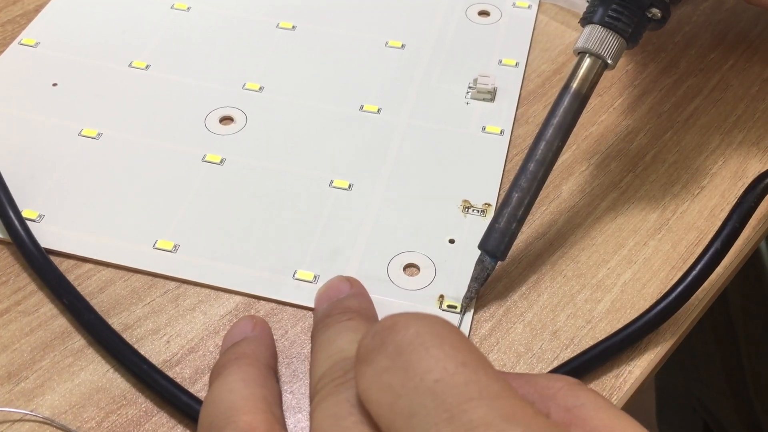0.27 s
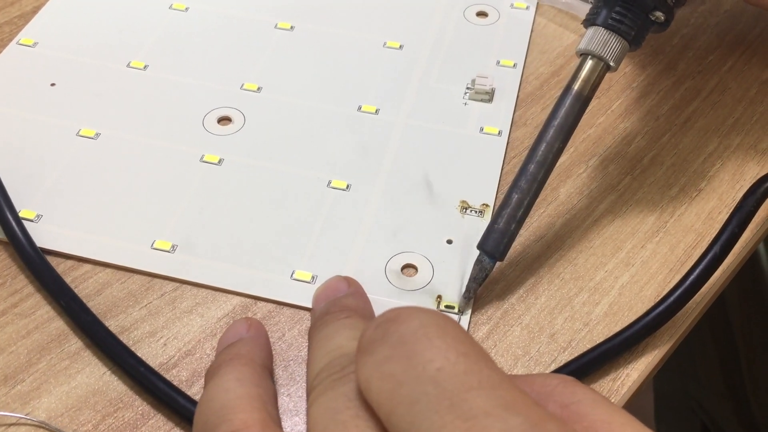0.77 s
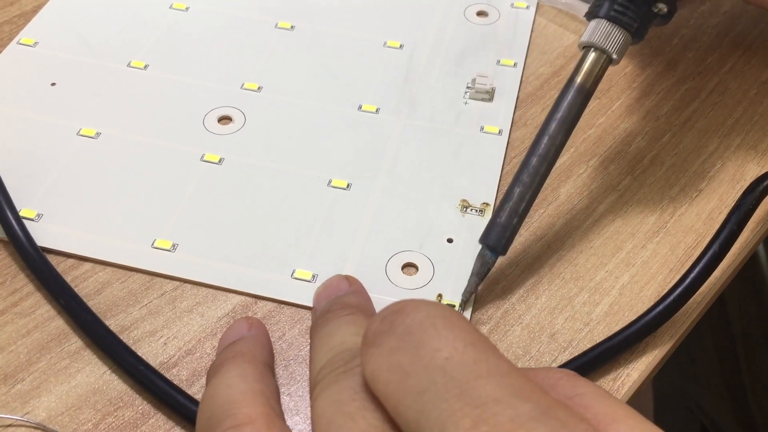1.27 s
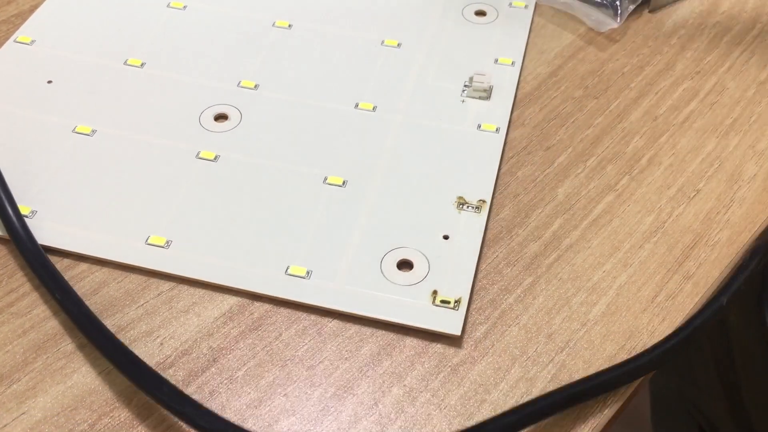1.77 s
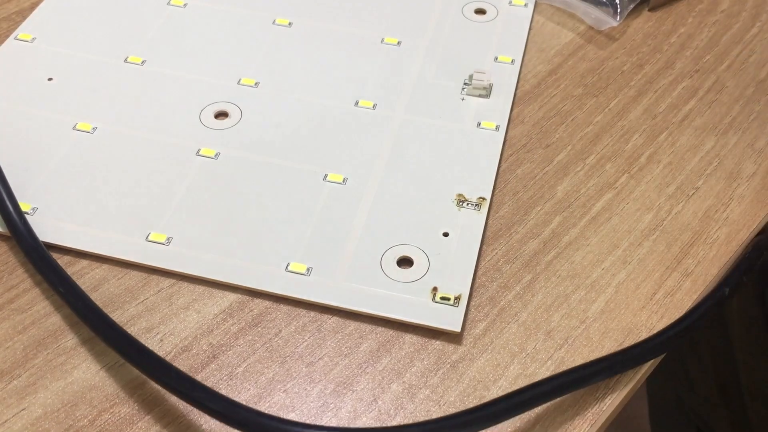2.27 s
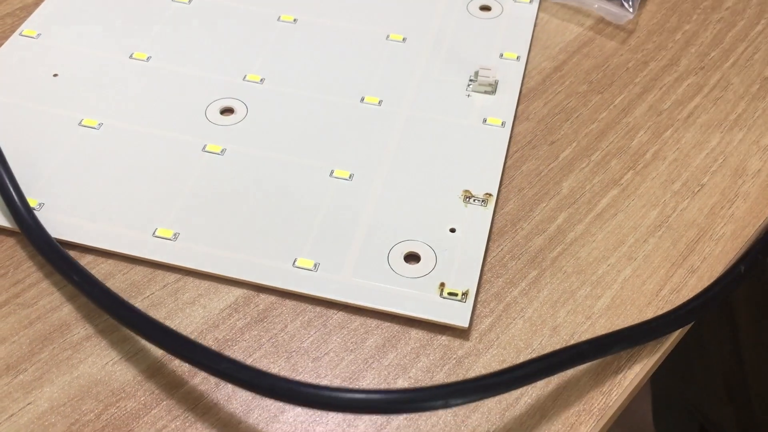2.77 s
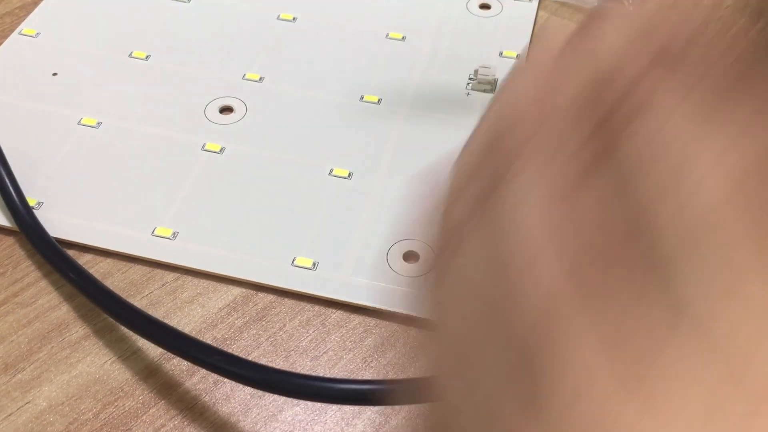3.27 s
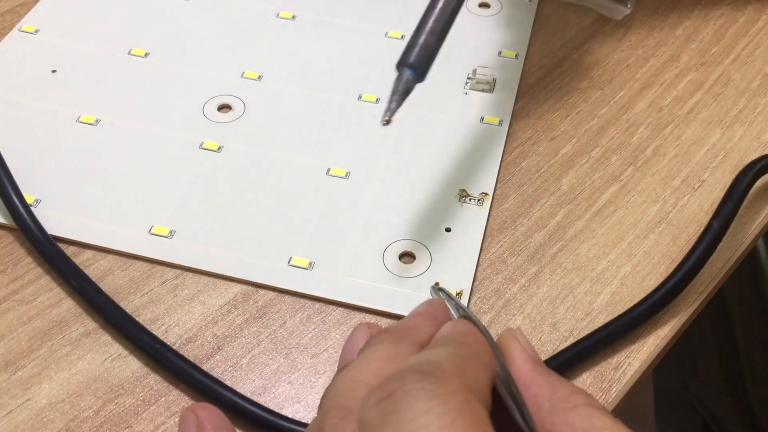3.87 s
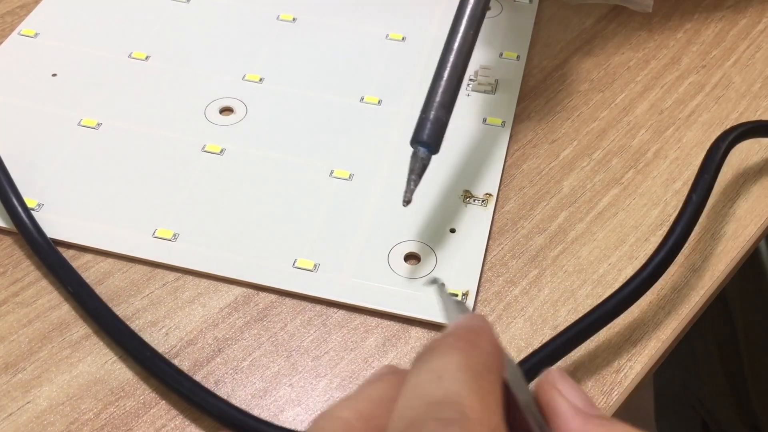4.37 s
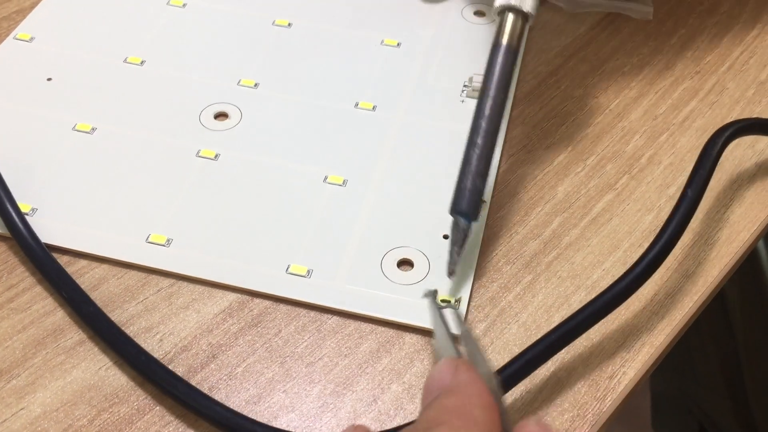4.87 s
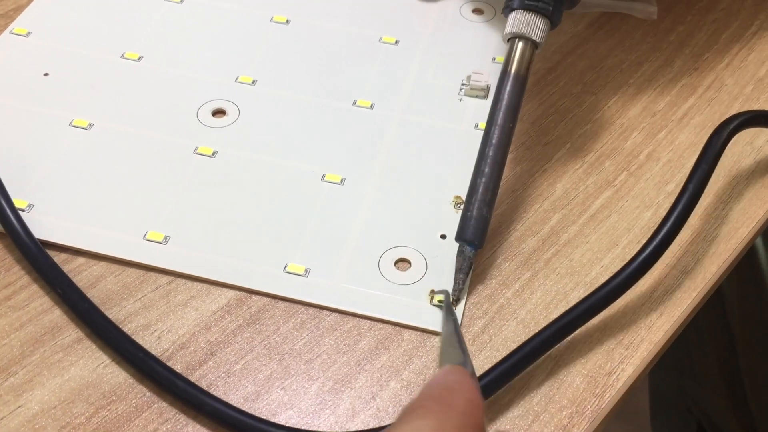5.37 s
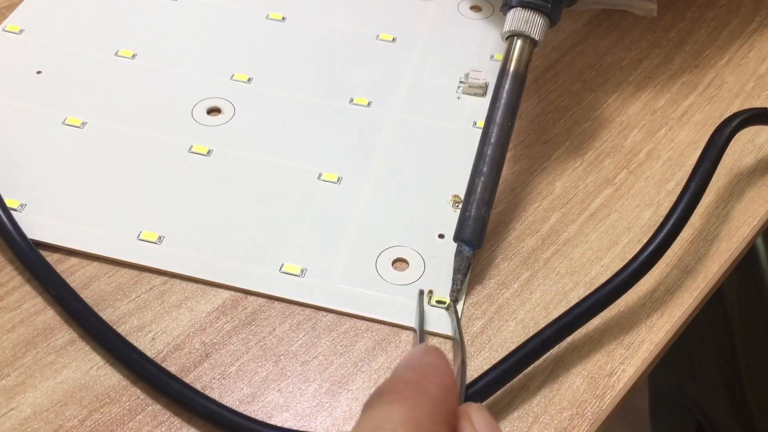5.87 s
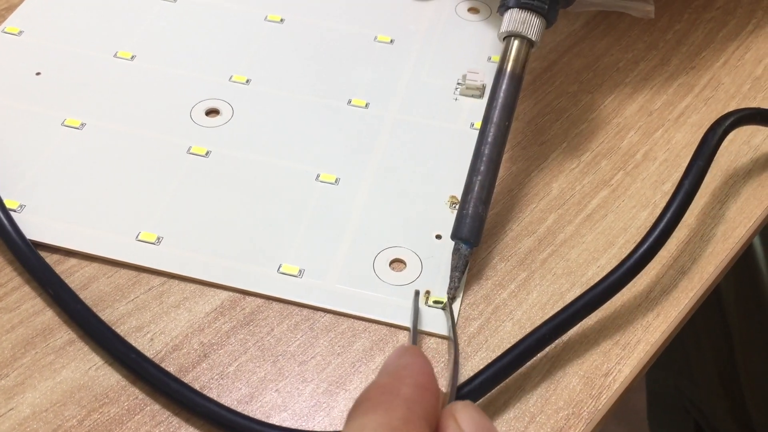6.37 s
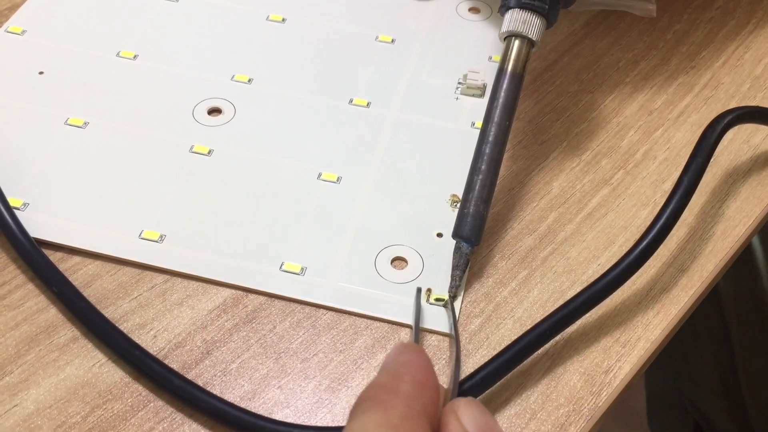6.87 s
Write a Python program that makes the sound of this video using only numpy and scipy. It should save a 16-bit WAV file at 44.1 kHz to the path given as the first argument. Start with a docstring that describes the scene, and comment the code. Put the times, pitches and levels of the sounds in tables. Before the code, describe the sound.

Close microphone at a wooden bench in a small quiet room. Low hiss and soft rumble lie beneath. After over a second of near silence come faint taps and scrapes, a dull double knock, then a loud, bright clatter as a metal tool lands with a short rattle. Later, tweezers click and scratch on a circuit board in a quick cluster, then little but room air.

```python
"""Soldering at a wooden bench

Tools knock, clink, rattle and scrape on the bench in a small, quiet room; tweezers and iron tip
tick on a circuit board, and solder hisses faintly. Contacts are a snap plus damped noise in five bands,
with decaying sines for ringing parts; rubs and solder fizz are slip trains, squeaks are filtered noise,
and steady shaped noise lies beneath."""
import sys
import numpy as np
from scipy import signal
from scipy.fft import rfft, irfft
from scipy.io import wavfile

SR = 44100
rng = np.random.default_rng(int(sys.argv[2]) if len(sys.argv) > 2 else 0)


def inscribe(sig):
    """Save sig as 16-bit PCM at rate SR to the path in sys.argv[1].

    A 1-D sig is mono; a 2-D sig holds one channel per row.
    Samples are clipped to [-1, 1] before scaling.
    """
    pcm = np.round(np.clip(np.atleast_2d(sig).T, -1, 1) * 32767)
    wavfile.write(sys.argv[1], SR, pcm.astype(np.int16))


N = 314433
HIT_SAMPLES = SR // 100   # event levels refer to 10 ms
TAIL_S = np.arange(int(0.6 * SR)) / SR

# tool knocks: t/s, level/dB, hardness/dB, weight/dB, resonance f/Hz, base t60/s, clink/dB re level
KNOCK_EVENTS = [(1.394, -42, 5, -9.5, 3160, 0.019, -37), (1.503, -51, -2, 0, 1900, 0.065, -26),
                (1.627, -49, -2, -3.5, 2100, 0.044, -19), (1.8667, -28, -12, -15.5, 2540, 0.014, -47),
                (1.87, -28.5, -7, -12.5, 2390, 0.026, -45), (2.442, -36, 4, -2, 2410, 0.05, -31.5),
                (2.4879, -35, 6, -10, 1700, 0.054, -13.5), (2.4934, -19.5, 7.5, -14.5, 1880, 0.024, -9),
                (2.5037, -21.5, -1.5, -16.5, 2210, .029, -29), (2.5418, -30, 2, -14.5, 1866, 0.044, -8.5)]
# tweezer and tip taps: t/s, level/dB, hardness/dB, resonance f/Hz, base t60/s
TICK_EVENTS = [(1.585, -57.5, -27, 1560, 0.066), (1.7464, -51, 13, 13600, .021),
               (1.7645, -70, 20, 13400, 0.025), (2.4785, -57, 14, 12000, 0.0061),
               (2.881, -45, 7, 3360, 0.017), (3.009, -56.5, 11.5, 8400, 0.032),
               (3.262, -57.5, 8.5, 3260, 0.028), (3.4507, -49, -6, 2420, 0.052),
               (3.6022, -52.5, -15, 2530, 0.043), (3.7083, -34.5, 5, 3940, 0.03),
               (3.713, -43.5, 2, 4400, 0.024), (3.857, -29, -7, 3050, 0.02),
               (3.8796, -35.5, -24, 1420, .008), (3.9919, -37.5, 0, 2880, 0.044),
               (4.0103, -44, -3, 1160, 0.013), (4.026, -41, 3.5, 2970, 0.024),
               (4.0498, -39, 4, 5500, 0.0097), (4.963, -64, -38.5, 1270, 0.023),
               (5.0384, -45, 5.5, 4070, 0.033), (5.247, -60.5, -23, 3140, 0.052)]
# prongs springing together: t/s, level/dB
PINCH_EVENTS = [(3.4949, -45), (3.5054, -48), (3.512, -50), (3.627, -59)]
# metal catching and squeaking: t/s, level/dB, f/Hz
SQUEAK_EVENTS = [(0.862, -57.5, 12300), (1.701, -57, 14100), (2.043, -50, 2150), (2.105, -49.5, 2420),
                 (4.137, -63, 4100), (4.748, -59.5, 3260), (4.769, -59, 2500), (4.811, -63, 3880)]
# scrapes, drags, solder fizz: t/s, length/s, level/dB, hardness/dB, weight/dB
RUB_EVENTS = [(0.836, 0.017, -79, 27, 0), (0.857, .04, -95, 23, -2), (1.523, 0.024, -63, 15.5, -10),
              (1.565, 0.022, -63, 13.5, 5), (1.679, .095, -68, 14.5, 0.5), (1.82, 0.055, -58.5, 7, 4.5),
              (1.877, 0.052, -54, 8, -10), (2.15, 0.25, -72.5, -4, 0), (2.409, 0.067, -65.5, 9, 9.5),
              (2.443, 0.065, -49, 0, 0.5), (2.481, 0.0085, -32, -10, -13), (2.513, 0.025, -44.5, -10, 4.5),
              (3.19, 0.33, -73.5, 13, -0.5), (3.556, 0.083, -69, 9.5, 5.5), (3.676, 0.029, -66.5, 10, 7),
              (3.719, 0.024, -75.5, -4.5, 20.5), (3.839, 0.026, -43.5, 5.5, -16),
              (3.961, 0.034, -46, 5, -25), (3.991, 0.075, -46, 5.5, -25), (4.041, 0.0061, -40.5, 13.5, -23),
              (4.099, 0.021, -49, 5, -19), (4.164, 0.028, -63, 0, 4), (4.245, 0.089, -68.5, 1, -2),
              (4.73, 0.086, -66, 4.5, -18)]

# contact bands at hardness 0, weight 0, re middle band: thump/dB, body/dB, edge/dB, air/dB
KNOCK_BANDS_DB = (-1.5, -0.5, -18, -30.5)
TICK_BANDS_DB = (-27.5, -0.5, -6.5, -15)
RUB_BANDS_DB = (-1, -2, -13.5, -20.5)
# edges of thump, body, middle, edge and air bands: f/Hz
BAND_EDGES_HZ = [70, 470, 1300, 4800, 10300, 15300]
# decay per band: ring time re base t60 (ratio), room t60/s, room level/dB
BAND_DAMPING = [(1.78, 0.58, 0.5), (2.83, .42, 0), (1.45, 0.42, -1), (1.026, 0.302, -0.5),
                (.85, 0.557, -1.5)]

# bench top modes: f/Hz, level/dB, t60/s
BENCH_MODES = [(48.1, -14.5, 0.25), (92, -18, 0.2), (118.4, -12.5, 0.16), (203, 0.5, 0.2),
               (289.4, -1, 0.14), (379, -10.5, 0.23), (734, -14, .2), (810, -14, .16), (1010, -13, .14)]
# dense modes of the board on the bench: f/Hz, level/dB, t60/s
BOARD_MODES = [(1150, -17, 0.54), (1328, -15, 0.32), (1524, 13.5, 0.085), (1834, -9, 0.42),
               (1733, -5.5, 0.32), (2158, -1, 0.255), (2200, -1, 0.44), (2408, 0.5, 0.293),
               (2660, -13.5, 0.58), (2439, -5, 0.25), (3230, 1, 0.459), (3640, -10.5, 0.15),
               (4484, -24.5, 0.26), (4700, -11, 0.232)]
# steel tool modes: f/Hz, level/dB, t60/s
STEEL_MODES = [(7800, -20.5, 0.18), (8620, -12.5, .07), (9000, -6.5, .05), (11500, -14.5, .07),
               (13085, -4, 0.085), (13400, -9.5, .025), (14070, -4, .03), (14475, 1.5, .06),
               (14930, -8.5, .04)]
# free tweezer arms: f/Hz, level/dB, t60/s
ARM_MODES = [(2170, 1.5, .11), (3790, 4, 0.153), (4620, -8, .14), (5200, -6.5, .05), (8597, -11, 0.14)]
# finger-damped tweezer prongs: f/Hz, level/dB, t60/s
PRONG_MODES = [(6120, -2.5, 0.014), (6550, -6, 0.014), (9600, -9, 0.015), (10800, -10, .011)]

# bench response to heavy blows: f/Hz, gain/dB, Q
BLOW_RESONANCES = [(72, -5, 2.2), (150, -5.5, 4), (385, 0.5, 7), (200.3, -0.5, 8), (282, 1.5, 8),
                   (535, -3.5, 5), (665, 0.5, 6.4), (912, -12.5, 5.8), (1320, -4.5, 8.4), (1610, 2, 4.9),
                   (1980, 2.5, 10.2), (2465, 3, 12), (3050, -3.5, 3.9)]
# tweezers and tip pressed on the board: f/Hz, gain/dB, Q
TIP_RESONANCES = [(420, -3.5, 3), (620, 4.5, 5), (1100, 1.5, 4), (1740, 1, 9.1), (2179, 2.5, 7.2),
                  (3050, 0.5, 7.4), (4200, 1.5, 14.3), (5500, -1.5, 9.2), (7450, -11, 7.4), (8850, -2, 10)]
# resonances and gaps common to all bench contacts: f/Hz, gain/dB, Q
BENCH_COLOUR = [(536, -0.5, 5.6), (663, -2, 6.8), (1583, 1.5, 14), (2290, 1.5, 11.75), (2730, -3, 8.7),
                (3752, -5, 13.1), (3730, 4, 21.94), (6500, -1.5, 5.2)]
# spectrum of room air and microphone hiss: f/Hz, relative density/(dB per Hz)
AIR_SPECTRUM = [(15, -36), (25, -2.5), (76, -2), (157, -3), (185, -5), (212, -8), (405, -10.5),
                (503, -13.5), (575, -13), (659, -15.5), (1260, -16), (2610, -18.5), (10400, -26.5),
                (14800, -28), (16000, -39.5)]

AIR_DB_PER_HARDNESS_DB, BODY_DB_PER_WEIGHT_DB = 1.4, 0.52
# a hard point moves less wood than a blunt touch
TAP_WEIGHT_DB, TAP_WEIGHT_DB_PER_HARDNESS_DB = -19, -0.9


def knocks(bench_db=1.5, board_db=-15.0, rattle_db=-11.5, room_db=-9.0):
    """Blows set bench, board, steel and loose parts ringing; weight adds boom, softness a hollow peak."""
    out = np.zeros(N)
    for t_s, db, hardness_db, weight_db, hz, t60_s, clink_db in KNOCK_EVENTS:
        peak_db = 10.0 - 0.8 * hardness_db
        gains = band_gains(db, hardness_db, weight_db, KNOCK_BANDS_DB)
        blow = contact(gains, hz, peak_db, t60_s, room_db, snap=1.0, q=2.16)
        boom = from_db(weight_db + bench_db) * modes(BENCH_MODES, spread_db=2.0)
        ring = from_db(board_db) * modes(BOARD_MODES, spread_db=4.0)
        clink = from_db(clink_db) * modes(STEEL_MODES, spread_db=4.0)
        chatter = from_db(rattle_db) * rattle()
        ringing = boom + ring + clink + chatter
        add(out, t_s, blow + from_db(db) * ringing * np.sqrt(HIT_SAMPLES))
    return out


def rattle(t60_s=0.43, low_hz=1500, high_hz=4300, ring_t60_s=0.0145, contacts_per_s=500):
    """Loose parts chatter: a dying run of small contacts, each ringing at one of 12 pitches; energy 1."""
    pitches_hz = np.geomspace(low_hz, high_hz, 12)
    pitch_index = rng.integers(0, len(pitches_hz), len(TAIL_S))
    hits = rng.random(len(TAIL_S)) < contacts_per_s / SR
    clicks = rng.standard_normal(len(TAIL_S)) * fade(t60_s) * hits
    out = np.zeros(len(TAIL_S))
    for k, hz in enumerate(pitches_hz):
        ring = fade(ring_t60_s) * np.sin(2 * np.pi * hz * TAIL_S)
        out += signal.fftconvolve(clicks * (pitch_index == k), ring)[:len(TAIL_S)]
    return unit_energy(out)


def ticks(board_db=-22.0, arms_db=-18.0, arms_db_per_hardness_db=0.402, room_db=-12.0):
    """Steel points tap: mostly snap; strong taps resonate more, hard ones ring the arms more."""
    out = np.zeros(N)
    for t_s, db, hardness_db, hz, t60_s in TICK_EVENTS:
        weight_db = TAP_WEIGHT_DB + TAP_WEIGHT_DB_PER_HARDNESS_DB * hardness_db
        gains = band_gains(db, hardness_db, weight_db, TICK_BANDS_DB)
        peak_db = 10.5 + 0.2 * (db + 49.0)
        tap = contact(gains, hz, peak_db, t60_s, room_db, snap=2.06, q=7.4)
        arms = from_db(arms_db + arms_db_per_hardness_db * hardness_db) * modes(ARM_MODES, spread_db=2.0)
        ring = from_db(board_db) * modes(BOARD_MODES, spread_db=2.0)
        add(out, t_s, tone(tap, TIP_RESONANCES) + from_db(db) * (arms + ring) * np.sqrt(HIT_SAMPLES))
    return out


def pinches(click_db=-10.5, hardness_db=4.5, t60_s=0.017, room_db=-7.0):
    """Prongs meet with a tiny click and a short, high ping of damped modes."""
    out = np.zeros(N)
    for t_s, db in PINCH_EVENTS:
        gains = band_gains(db + click_db, hardness_db, TAP_WEIGHT_DB, TICK_BANDS_DB)
        click = contact(gains, 6100, 29.0, t60_s, room_db, snap=1.8, q=5.0)
        ping = modes(PRONG_MODES, spread_db=1.5)
        add(out, t_s, click + from_db(db) * ping * np.sqrt(HIT_SAMPLES))
    return out


def squeaks(rise_s=0.0025, t60_s=0.028, room_db=-8.0, room_t60_s=0.25, q=4.3):
    """A brief burst of friction drives one narrow resonance."""
    out = np.zeros(N)
    for t_s, db, hz in SQUEAK_EVENTS:
        attack = 1 - np.exp(-TAIL_S / rise_s)
        friction = unit_energy(rng.standard_normal(len(TAIL_S)) * attack * fade(t60_s))
        friction = friction + from_db(room_db) * unit_energy(room_tail(room_t60_s))
        b, a = signal.iirpeak(hz, q, fs=SR)
        squeak = signal.lfilter(b, a, signal.lfilter(b, a, friction))
        add(out, t_s, from_db(db) * unit_energy(squeak) * np.sqrt(HIT_SAMPLES))
    return out


def rubs(slips_per_s=3200, grain_db=1.5, release_s=0.0029, room_db=-9.5):
    """Sliding metal catches and slips in tiny uneven steps that excite the five bands."""
    out = np.zeros(N)
    for t_s, length_s, db, hardness_db, weight_db in RUB_EVENTS:
        press = np.minimum(TAIL_S / (0.221 * length_s), 1)
        release = np.exp(-np.maximum(TAIL_S - length_s, 0) / release_s)
        sizes = from_db(grain_db * np.minimum(rng.exponential(1, len(TAIL_S)), 4))
        signs = rng.choice([-1, 1], len(TAIL_S))
        slipping = rng.random(len(TAIL_S)) < slips_per_s / SR
        slips = press * release * sizes * signs * slipping + 1e-12
        slips = resonance(slips, 2890, 11.0, 1.7)
        gains = band_gains(db, hardness_db, weight_db, RUB_BANDS_DB) * np.sqrt(length_s * SR)
        for k, (_, room_t60_s, band_room_db) in enumerate(BAND_DAMPING):
            room = walls(signal.fftconvolve(slips, room_tail(room_t60_s))[:len(TAIL_S)])
            room_gain = from_db(room_db + band_room_db)
            add(out, t_s, gains[k] * (in_band(slips, k) + room_gain * in_band(room, k)))
    return out


def contact(gains, hz, peak_db, t60_s, room_db, snap, q):
    """A sharp impulse, then dense, quickly damped modes as noise, then the room; five bands."""
    out = 0
    # long (soft) contacts start slower, with less snap
    attack = 1 - np.exp(-TAIL_S / (0.029 * t60_s))
    echo_s = rng.uniform(0.0007, 0.0016)
    for k, (stretch, room_t60_s, band_room_db) in enumerate(BAND_DAMPING):
        drive = unit_energy(rng.standard_normal(len(TAIL_S)) * attack * fade(t60_s * stretch))
        drive[0] += snap * np.exp(-t60_s / 0.054)
        struck = tone(drive, [(hz, peak_db / 2, q)] * 2)
        direct = in_band(bench_echo(struck, echo_s), k)
        reflections = resonance(room_tail(room_t60_s), hz, peak_db * 0.559, q)
        room = in_band(walls(reflections), k)
        out = out + gains[k] * (direct + from_db(room_db + band_room_db) * room)
    return out * np.sqrt(HIT_SAMPLES)


def band_gains(db, hardness_db, weight_db, plain_db):
    """Five gains, low to high: weight moves more wood (lower two), hardness brightens (upper two)."""
    thump_db, body_db, edge_db, air_db = plain_db
    relative_db = np.array([thump_db + weight_db,
                            body_db + BODY_DB_PER_WEIGHT_DB * weight_db,
                            0,
                            edge_db + hardness_db,
                            air_db + AIR_DB_PER_HARDNESS_DB * hardness_db])
    return from_db(db + relative_db)


def modes(table, spread_db):
    """Decaying sines, struck with new strengths each time; energy 1."""
    strengths = from_db(spread_db * rng.standard_normal(len(table))) * rng.choice([-1, 1], len(table))
    out = np.zeros(len(TAIL_S))
    for strength, (hz, db, t60_s) in zip(strengths, table):
        out += strength * from_db(db) * fade(t60_s) * np.sin(2 * np.pi * hz * TAIL_S)
    return unit_energy(out)


def bench_echo(x, delay_s, share=0.37):
    """The bench top returns a contact a moment later, which scallops its spectrum."""
    lag = round(delay_s * SR)
    return x + share * np.concatenate([np.zeros(lag), x[:-lag]])


def walls(x):
    """The room returns the middle range best."""
    return tone(x, [(2150, 16.0, 1.1), (917, 8.0, 3.2), (5900, 3.5, 1.97)])


def room_tail(t60_s, build_s=0.0052):
    """Reflections, as noise, thicken within milliseconds and then die away."""
    return rng.standard_normal(len(TAIL_S)) * fade(t60_s) * (1 - np.exp(-TAIL_S / build_s))


def tone(x, rows):
    """A chain of resonances: f/Hz, gain/dB, Q."""
    for hz, gain_db, q in rows:
        x = resonance(x, hz, gain_db, q)
    return x


def resonance(x, hz, gain_db, q):
    """Raise or lower one region around hz."""
    b, a = signal.iirpeak(hz, q, fs=SR)
    return x + (from_db(gain_db) - 1) * signal.lfilter(b, a, x)


def in_band(x, k):
    """Band k of a sound; energy 1."""
    sos = signal.butter(5, BAND_EDGES_HZ[k:k + 2], "band", fs=SR, output="sos")
    return unit_energy(signal.sosfilt(sos, x))


def fade(t60_s):
    """Exponential decay of 60 dB in t60_s."""
    return np.exp(-np.log(1000) * TAIL_S / t60_s) + 1e-12


def from_db(db):
    """Decibels to amplitude ratio."""
    return 10 ** (np.asarray(db) / 20)


def unit_energy(x):
    """Scale to a sum of squares of 1."""
    return x / np.sqrt(np.sum(x ** 2) + 1e-20)


def add(out, t_s, sound):
    """Mix a sound in at t_s, cut at the end."""
    start = round(t_s * SR)
    out[start:start + len(sound)] += sound[:N - start]


def room_air(level_db=-62):
    """Steady low rumble and soft hiss: noise shaped over log frequency."""
    hz, db = np.transpose(AIR_SPECTRUM)
    bins_hz = np.maximum(np.arange(N // 2 + 1) * SR / N, 1)
    shape = from_db(np.interp(np.log(bins_hz), np.log(hz), db))
    noise = irfft(rfft(rng.standard_normal(N)) * shape, N)
    noise = resonance(noise, 196.2, 3.5, 5.2)
    return from_db(level_db) * unit_energy(noise) * np.sqrt(N)


def scene():
    """All bench contacts share one colour; room air lies beneath; one channel."""
    contacts = tone(knocks(), BLOW_RESONANCES) + ticks() + pinches() + squeaks() + rubs()
    return (tone(contacts, BENCH_COLOUR) + room_air())[None]


def record(dry):
    """The microphone loses the deepest bass and has two shallow notches; the top is cut."""
    notched = tone(dry, [(10370, -7.5, 17.0), (4870, -6.5, 16.0)])
    high_pass = signal.butter(8, 31, "high", fs=SR, output="sos")
    low_pass = signal.ellip(10, 0.1, 80, 16100, fs=SR, output="sos")
    return signal.sosfilt(low_pass, signal.sosfilt(high_pass, notched))


dry = scene()
out = record(dry)
inscribe(out)
```